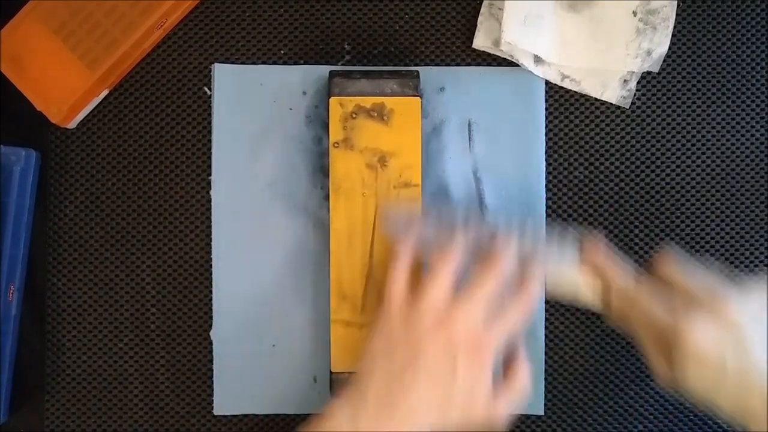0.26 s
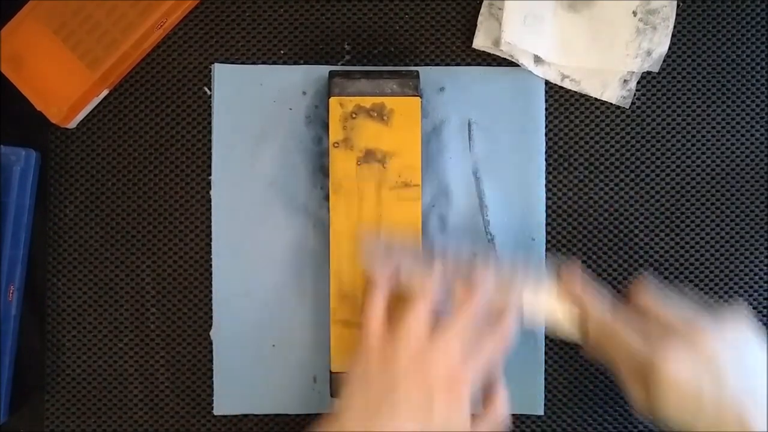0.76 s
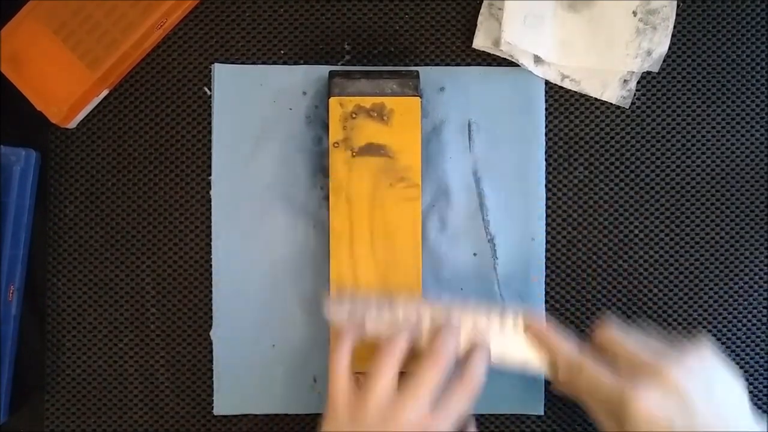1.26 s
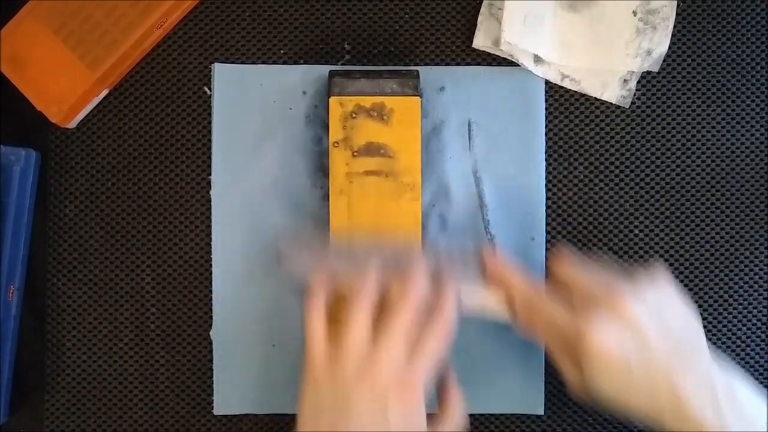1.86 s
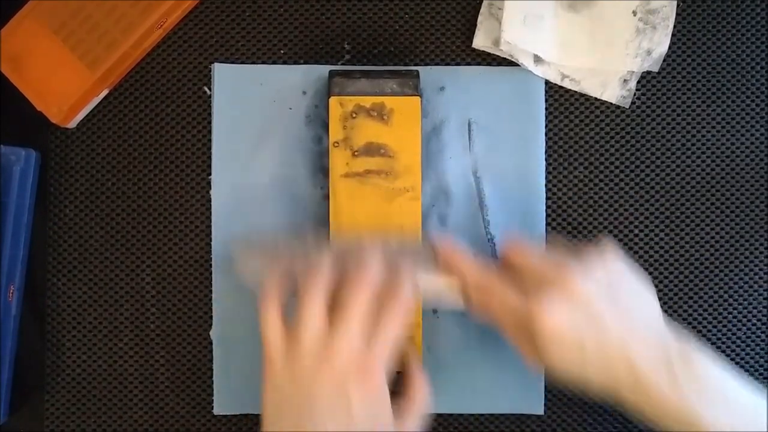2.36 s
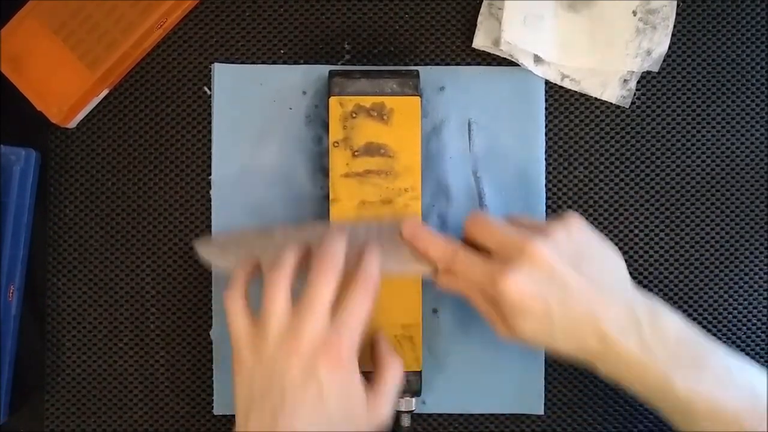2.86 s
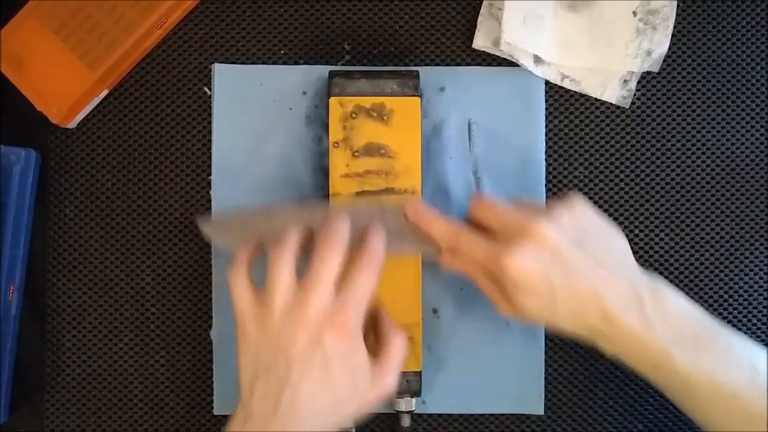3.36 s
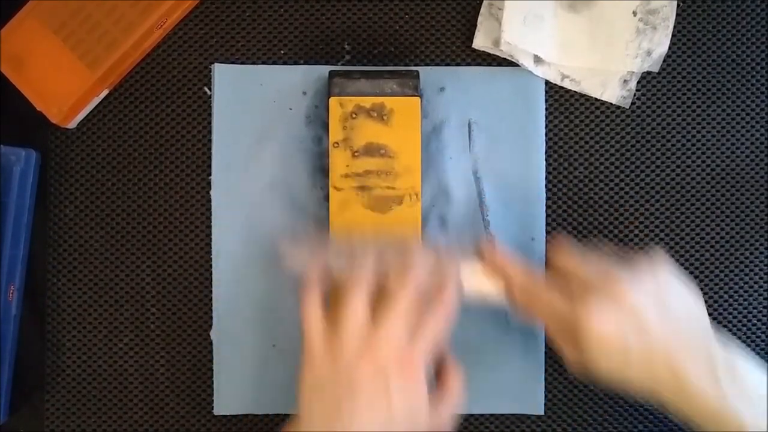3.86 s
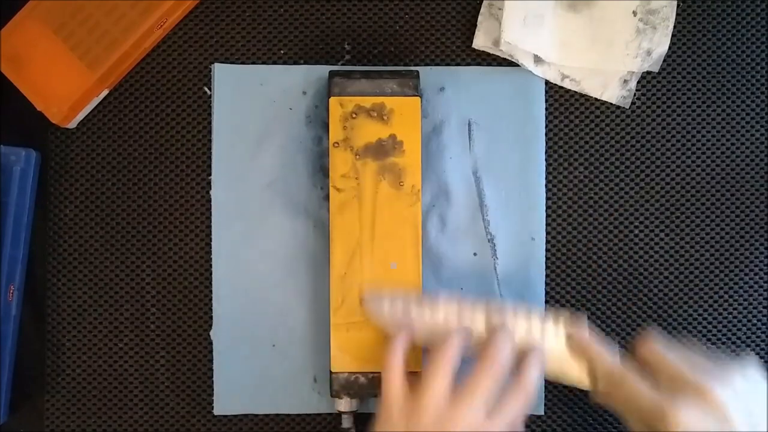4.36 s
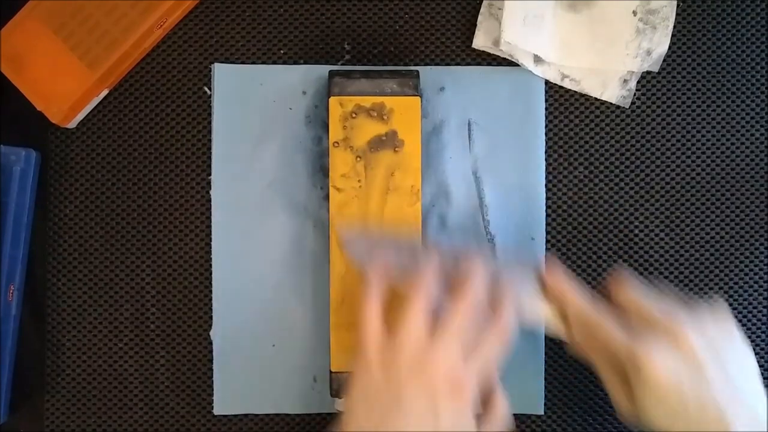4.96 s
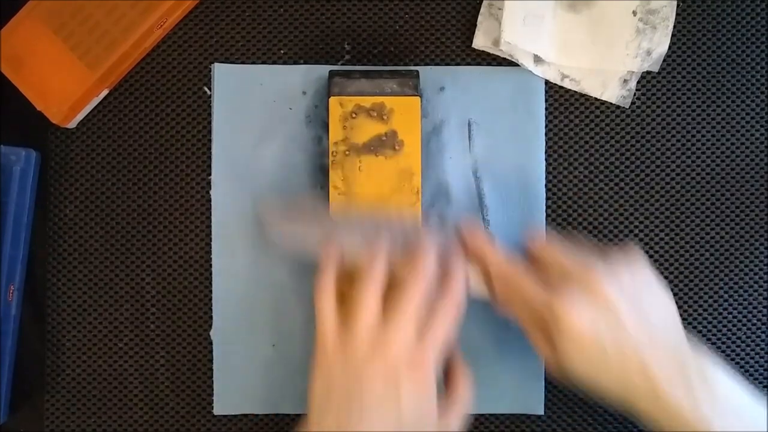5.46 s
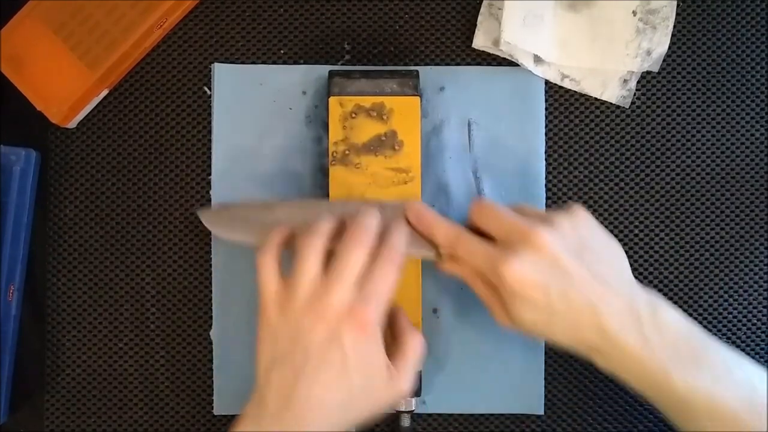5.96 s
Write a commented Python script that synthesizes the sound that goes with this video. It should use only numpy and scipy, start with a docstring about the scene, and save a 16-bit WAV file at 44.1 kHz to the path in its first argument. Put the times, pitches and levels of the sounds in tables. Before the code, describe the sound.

A steel knife blade is stroked briskly back and forth on a wet whetstone, a bright gritty rasp with a thin metallic ring, growing louder.

```python
"""Blade on a wet whetstone

A steel blade is drawn back and forth over a wet whetstone on a table. Grit clicks, coloured by the steel,
make a rasp that sinks at each turn; a cluster of beating modes rings over it. The overhanging blade hums in
a bending mode whose pitch moves with the free length. The table rumbles over a quiet room tone.
All layers are shaped noise, spread over two sides."""
import sys
import numpy as np
from scipy import signal
from scipy.io import wavfile
from scipy.ndimage import uniform_filter1d

SR = 44100
rng = np.random.default_rng(int(sys.argv[2]) if len(sys.argv) > 2 else 0)


def unload_wav(signal):
    """Save mono or channel-first audio to the path in sys.argv[1] as 16-bit WAV at rate SR, clipped to [-1, 1]."""
    wavfile.write(
        sys.argv[1],
        SR,
        np.round(np.clip(np.atleast_2d(signal).T, -1, 1) * 32767).astype(np.int16),
    )


N = 274302
T = np.arange(N) / SR  # seconds
SIZE = 2048  # samples in a spectral frame
HZ = np.fft.rfftfreq(SIZE, 1 / SR)[:, None]

# The back and forth of the blade; rasp and ring levels stand before the layers' own trims and the bite.
# Each row: turn in seconds, rasp at the turn in dB, rasp once moving in dB, place of the fastest moment
# between moving and braking (0-1), rasp then in dB, rasp before braking in dB, ring over the rasp early in dB,
# the same late in dB, centre of the excited ring modes early in Hz, the same late in Hz, contact in dB.
STROKES = [(-0.142, -56.4, -43.4, 0.45, -40.5, -47, -7.5, -3.5, 3550.0, 3750, 12),
           (0.06, -54.5, -45, 0.6, -38.5, -44.5, -13, -26, 3900, 3720.0, 4),
           (0.282, -57, -41, 0.81, -39, -45.5, -45, 3, 3700, 3900, 2.5),
           (0.503, -55, -43.5, 0.7, -38, -41.5, -23, -19, 3900, 3770, 5),
           (0.729, -53, -41, 0.89, -36, -39, -24, -9, 3640, 3360, 2.5),
           (0.946, -50.5, -44, 0.68, -34, -36.5, -11.5, 1, 3760, 3300, 4),
           (1.182, -50.5, -40, 0.71, -34, -40, 3, -1, 3840, 3200, 7),
           (1.405, -52, -46.5, 0.8, -31, -34.5, -19, 0, 3740.0, 3430, 7.5),
           (1.647, -50, -39, 0.2, -33.5, -36, -9.5, 3.5, 3100, 3230, 7.5),
           (1.852, -51.5, -43, 0.59, -30.5, -36, -7, 1.5, 3480, 3450, 3.5),
           (2.086, -45.5, -33, 0.71, -34.5, -28.5, -5, 6.5, 3480, 2900, 5),
           (2.309, -43.5, -39, 0.6, -28.5, -31.5, -2.5, -0.5, 3340, 3070, 2.5),
           (2.536, -43, -33.5, 0.33, -28.5, -32.5, 0, 9.5, 3250, 3390, 1),
           (2.745, -45, -41.5, 0.72, -26.5, -36, 2, 13, 3270, 3420, -2),
           (2.975, -46.5, -36.5, 0.38, -28, -40, -4, 10, 2910, 3340, 0),
           (3.186, -49, -39, 0.67, -27.5, -35, 1, 9, 3180, 3420, 0),
           (3.414, -45.5, -34.5, 0.42, -36.5, -37.5, -9, -1, 3000, 3180, 4),
           (3.631, -44.5, -39.5, 0.84, -26, -32.5, -4, -3.5, 2920, 3730, 0),
           (3.837, -42, -41, 0.23, -37.5, -35, -14, -8.5, 2900, 3580, -4.5),
           (4.072, -38, -40.5, 0.79, -31, -39.5, -6.5, -5, 3520, 3680, 2.5),
           (4.302, -43.5, -42, 0.8, -37, -43.5, -19, -10, 3740, 3900, 3.5),
           (4.512, -54, -44.5, 0.69, -39, -33.5, -29, -25, 3800, 3600, 5.5),
           (4.729, -50.5, -41, 0.25, -39.5, -36, -22, -14, 3620, 3740, 3),
           (4.939, -52.5, -44, 0.98, -30, -37, -14, -6.5, 3570, 3500, 4.2),
           (5.203, -39.5, -37.5, 0.4, -38, -32.5, -10.5, 1.5, 2766, 3220, 8),
           (5.405, -43.5, -48, 0.67, -30, -32, -2, 0.5, 3390, 3300, 8),
           (5.64, -41.5, -43, 0.87, -31, -30, -11, 1, 3240, 3020, 4.5),
           (5.856, -45.5, -41, 0.63, -27, -35, -3.5, 10.5, 3240, 3440, -0.5)]
SPEED_UP_S, BRAKE_S = 0.021, 0.035  # from a turn to moving, and from braking to the next turn
STOP_S = 6.119  # the last stroke ends
FIRM_DB = -30  # rasp of a firm stroke


def gain_of(db):
    """Decibels to gain."""
    return 10 ** (np.asarray(db) / 20)


def evened(x):
    """Scales to rms 1."""
    return x / np.sqrt(np.mean(x ** 2) + 1e-20)


def read(points):
    """Reads a spectrum table on the frequency bins, along log frequency."""
    f, value = np.transpose(points)
    return np.interp(np.log(HZ + 1), np.log(f + 1), value)


def follow(rows, t):
    """The columns of a curve at times t."""
    s, *columns = np.transpose(rows)
    return [np.interp(t, s, c) for c in columns]


def mode(hz, width):
    """Power of a resonance with total energy 1; width is the full width 6 dB down, in Hz."""
    shape = 1 / (1 + (2 * (HZ - hz) / width) ** 2) ** 2
    return shape / shape.sum(0)


def patches(shape, bins, frames):
    """Random field over pitch and time, smoothed over so many bins and frames, rms 1."""
    over_pitch = uniform_filter1d(rng.standard_normal(shape), bins, axis=0)
    return evened(uniform_filter1d(over_pitch, frames, axis=1))


def scratches(per_s, spread_db):
    """Frame times and spectra of two unrelated, equally strong streams of clicks of uneven size."""
    size = gain_of(spread_db * np.minimum(rng.exponential(1, (2, N)), 5))
    struck = rng.random((2, N)) < per_s / SR
    clicks = size * rng.standard_normal((2, N)) * struck
    _, t, z = signal.stft(evened(clicks), SR, nperseg=SIZE, noverlap=3 * SIZE // 4)
    return t, z / np.sqrt(2)


def heard(z, power, wider_db=0, shift_db=4):
    """Colours the streams and mixes them to two sides, whose likeness keeps shifting over pitch and time."""
    # Part of the sound that differs between the sides, before widening and shifting.
    # Each row: frequency in Hz, level in dB.
    side_part = [(60, -8.5), (280, -9), (400, -4), (600, -5), (1050, -19), (1350, -20), (1800, -5),
                 (2020, -6), (2090, -32), (2330, -34), (2560, -25), (2750, -6), (3250, -10), (3420, -26),
                 (3600, -25), (3900, -5), (4330, -22), (4780, -22), (5150, -5), (5700, -11), (6300, -6),
                 (6800, -8), (7200, -7), (7700, -13), (12000, -14), (13600, -7), (14300, -11)]
    # A stereo widener turns one side over and holds it back.
    # Each row: frequency in Hz, lead of the left side in half turns.
    left_lead = [(20, 1), (380, 1.1), (950, 2), (1400, 2), (1960, 2.55), (2090, 3), (2520, 3), (3250, 4),
                 (3650, 4), (4300, 4.98), (4900, 5.02), (5550, 6), (5850, 6.1), (6400, 7), (6900, 7.1),
                 (7700, 8), (15000, 8)]
    # Balance between the sides. Each row: frequency in Hz, left minus right in dB.
    left_tilt = [(200, .9), (500, 0), (1450, 0), (1800, 2.1), (2050, 0), (2560, 0), (2800, -4.5), (3200, 0),
                 (3700, 0), (4000, 3), (4350, 0), (4750, 0), (5100, -3.5), (6000, 0), (7700, 1.2),
                 (9000, -1.2), (14000, -.4)]
    shifting = patches(z.shape[1:], 12, 8)
    apart = np.clip(gain_of(read(side_part) + wider_db + shift_db * shifting), 0, 1)
    common = np.sqrt(1 - apart ** 2) * z[0]
    turn = np.exp(.5j * np.pi * read(left_lead)) * gain_of(read(left_tilt) / 2)
    left = (common + apart * z[1]) * turn
    right = (common - apart * z[1]) / turn
    pair = np.array([left, right]) * np.sqrt(SIZE * power)
    return signal.istft(pair, SR, nperseg=SIZE, noverlap=3 * SIZE // 4)[1][:, :N]


def stroke_db(t):
    """Rasp level: loudness follows blade speed, which picks up after a turn, peaks and brakes into the next."""
    # The edge catches on the stone and the rasp jumps up or down.
    # Each row: start in seconds, jump in dB, dying time in seconds.
    catches = [(0.294, -5, 0.023), (0.746, 3.5, 0.013), (1.657, 2, 0.012), (2.098, -6.5, 0.02),
               (3.195, 3, 0.012), (3.804, 3.5, 0.0065), (3.912, 4.5, 0.028), (4.095, 4.5, 0.012),
               (4.198, 3.5, 0.031), (4.745, 2.5, 0.017)]
    catch_rise_s = 0.00076
    settle_s, rest_s = 0.0039, 0.0066  # the blade lies almost still this long before and after a turn
    stop_db, fade_db_per_s = -40.5, 299  # the last stroke dies away
    turn, turn_db, moving_db, place, fastest_db, braking_db = np.transpose(STROKES)[:6]
    moving = turn + SPEED_UP_S
    braking = np.append(turn[1:], STOP_S) - BRAKE_S
    fastest = moving + np.clip(place, .04, .96) * (braking - moving)
    s = np.column_stack([turn - settle_s, turn + rest_s, moving, fastest, braking])
    db = np.column_stack([turn_db, turn_db, moving_db, fastest_db, braking_db])
    speed_gain = np.interp(t, np.append(s, STOP_S), gain_of(np.append(db, stop_db)))
    jumps_db = 0
    for start, jump_db, dying_s in catches:
        rise = np.clip((t - start) / catch_rise_s, 0, 1)
        jumps_db = jumps_db + jump_db * rise * np.exp(-np.maximum(t - start, 0) / dying_s)
    return jumps_db + 20 * np.log10(speed_gain) - fade_db_per_s * np.maximum(t - STOP_S, 0)


def grip(t):
    """Ring over rasp in dB, ring centre in Hz and contact in dB, sliding through each stroke."""
    early, late = 0.32, 0.86  # shares of a stroke at which its early and late values hold
    rows = np.array(STROKES)
    length = np.diff(np.append(rows[:, 0], STOP_S))[:, None]
    s = rows[:, :1] + length * [early, late]
    over_db, centre_hz = rows[:, 6:8], rows[:, 8:10]
    contact_db = rows[:, 10].repeat(2)
    return follow(np.column_stack([s.ravel(), over_db.ravel(), centre_hz.ravel(), contact_db]), t)


def bite(t):
    """Gain as the edge bites: it jumps at each turn, holds until the blade is moving, then settles."""
    bite_db, bite_s = 8, 0.038  # jump and dying time
    moving = np.transpose(STROKES)[0] + SPEED_UP_S
    stroke = np.maximum(np.searchsorted(moving, t + SPEED_UP_S) - 1, 0)
    since = t - moving[stroke]
    return gain_of(bite_db * np.exp(-np.maximum(since, 0) / bite_s))


def room(room_db=-56.5, drift_db=2.2):
    """Low room tone: steady noise under a falling spectrum that drifts in lumps."""
    # Colour of the room tone, before it is scaled as a whole.
    # Each row: frequency in Hz, density in dB per Hz.
    tone = [(25, 2), (45, -6), (65, 3), (130, 7.5), (300, 3.5), (390, 3), (480, -2.5), (600, -5.5),
            (1000, -5), (3000, -9.5), (14000, -29)]
    _, z = scratches(per_s=SR, spread_db=0)
    power = gain_of(2 * read(tone))
    lumps = gain_of(2 * drift_db * patches(z.shape[1:], 3, 10))
    return gain_of(room_db) * heard(z, power / power.sum() * lumps, shift_db=2.0)


def rumble(rumble_db=-55.0, share=1.0):
    """Hard strokes shake the stone's holder and the table: a broad low resonance with a narrow one in it."""
    t, z = scratches(per_s=12000, spread_db=1.5)
    level_db = rumble_db + share * (stroke_db(t) - FIRM_DB)  # share: dB per dB of rasp
    body = mode(430, 660) + 0.1 * mode(402, 66)
    return heard(z, gain_of(2 * level_db) * body, shift_db=1.0)


def bend(bend_db=-7.0, share=0.093, wobble=0.024, broken_db=6):
    """The overhanging blade hums in its lowest bending mode, higher as less of it hangs free."""
    # Path of the hum, before the trim and the wobble.
    # Each row: time in seconds, level under a firm stroke in dB, pitch in Hz.
    hum_path = [(0, -75, 1320), (.13, -48, 1530), (.36, -65, 1190), (.84, -58.5, 1050), (.9, -42.5, 1110),
                (.96, -51, 940), (1.16, -53, 1240), (1.24, -45.5, 1040), (1.38, -60, 890),
                (1.58, -48, 1460), (1.86, -62, 1370), (1.9, -40.5, 1366), (2.22, -39.5, 1360),
                (2.31, -45, 1156), (2.65, -42.5, 980), (2.76, -61, 970), (3.1, -49, 920), (3.44, -56, 950),
                (3.52, -40.5, 1020), (3.68, -44.5, 1245), (3.78, -36, 1410), (3.9, -57, 1410),
                (3.96, -48, 960), (4.26, -55.5, 1160), (4.5, -65, 1010), (5.05, -44.5, 1100),
                (5.14, -62, 1240), (5.21, -41.5, 1400), (5.28, -51.5, 1396), (5.72, -34.5, 1307),
                (5.9, -47, 1040), (5.94, -39, 1050), (6.22, -76, 970)]
    t, z = scratches(per_s=20000, spread_db=1)
    level_db, hz = follow(hum_path, t)
    level_db = level_db + bend_db + share * (stroke_db(t) - FIRM_DB)
    level_db = level_db + broken_db * np.minimum(patches(z.shape[1:], 6, 2), .6)  # the hum breaks up
    hz = hz * (1 + wobble * patches((1, len(t)), 1, 3)[0])
    hum = 1.08 * mode(hz, 92) + 0.06 * mode(hz, 1000)
    return heard(z, gain_of(2 * level_db) * hum)


def ring(skirt_db=-4, waver_db=13.5, ring_db=-9.0, linger_s=0.0061, gather=0.56):
    """A cluster of close modes; those near the excited centre sing loudest and beat together."""
    # Modes of the ringing blade. Each row: frequency in Hz, width in Hz, level within the cluster in dB.
    ring_modes = [(2870, 55, 0), (3010, 50, -2), (3140, 70, 0), (3230, 40, -2), (3308, 35, 2),
                  (3393, 35, 3), (3470, 35, 0), (3538, 50, 0), (3650, 35, 1), (3760, 50, -2)]
    t, z = scratches(per_s=18000, spread_db=3.0)
    over_db, centre_hz, _ = grip(t)
    cluster = sum(gain_of(2 * db) * mode(hz, width) for hz, width, db in ring_modes)
    waver = gain_of(2 * waver_db * np.minimum(patches(z.shape[1:], 3, 5), 1))
    focus = gain_of(-gather * np.maximum(over_db, 0))  # a strong ring gathers on fewer modes
    power = cluster * waver * mode(centre_hz, 260 * focus)
    skirt = gain_of(2 * skirt_db) * focus ** 2 * mode(centre_hz, 900) * waver
    power = power / power.sum(0) + skirt
    push = (gain_of(stroke_db(T)) * bite(T)) ** 2
    keep = np.exp(-1 / (linger_s * SR))  # the steel rings on a little as the push falls
    drive = np.maximum(push, signal.lfilter([1 - keep], [1, -keep], push))
    wider_db = 20 * (abs(HZ - 2480) < 220)
    return np.sqrt(drive) * heard(z, power * gain_of(2 * (over_db + ring_db)), wider_db, 5.4)


def rasp(streak_db=8.0, patchy_db=3.0, rasp_db=0.42, sing_width=260, top_streaks=0.65, band_shift_db=7):
    """Grit scratches drive the steel; narrow modes come and go as the contact point slides."""
    # Colour of grit on steel, before scaling. Each row: frequency in Hz, density in dB per Hz.
    grit_colour = [(300, -76), (800, -20), (1600, -15.5), (2200, -15.5), (2500, -29.5), (2900, -8.5),
                   (3500, -12.5), (3950, 0), (5000, 2), (6500, 3.5), (8000, 4.5), (10500, 6.5),
                   (12000, 6.5), (13000, 3.5), (13600, -4.5), (14100, 5), (14500, -13.5)]
    # How far contact lifts each range. Each row: frequency in Hz, share of the contact dB (0-1).
    contact_lift = [(300, 1), (2000, 0.85), (3900, 0.88), (4600, 0.5), (5500, 0.46), (8000, 0.51),
                    (12000, 0.12), (14000, 0.45)]
    # How far speed brightens each range. Each row: frequency in Hz, dB per dB of rasp.
    speed_tilt = [(7000, 0), (10000, 0.29), (12000, 0.27), (13000, 0.13), (14300, .05)]
    # Modes of the steel that stay put. Each row: frequency in Hz, width in Hz, level over the rasp in dB.
    steel_modes = [(3913, 69, -17.5), (5107, 93, -16), (5263, 68, -19.5), (5757, 38, -19),
                   (7790, 110, -18.5), (8700, 69, -20), (9430, 62, -16), (10720, 76, -15),
                   (12050, 200, -14.5)]
    # A mode sings for a moment, sliding with the blade.
    # Each row: start in seconds, end in seconds, from Hz, to Hz, level over the rasp at its height in dB.
    singing = [(0.07, 0.27, 8760, 9040, -3.5), (0.643, 0.722, 5000, 4960, -3), (0.91, 0.99, 4430, 4650, 4),
               (0.956, 1.101, 10470, 11440, 0.5), (0.986, 1.1, 4250, 4330, 0),
               (1.007, 1.098, 6040, 6050, -1), (1.133, 1.234, 5400, 4870, 2.5),
               (1.365, 1.676, 6940, 9080, -1.5), (1.467, 1.755, 1890, 2070, -16.5),
               (1.52, 1.795, 5230, 5260, -2.5), (1.642, 1.77, 8500, 8900, 1.5),
               (1.65, 1.757, 4000, 3970, -4), (1.95, 2.174, 5640, 5600, -2.5),
               (2.19, 2.562, 7970, 7150, -7), (3.803, 3.913, 1750, 2130, -15),
               (4.142, 4.26, 9800, 9240, -2), (4.185, 4.326, 4130, 4770, 1.5),
               (4.5, 4.67, 8830, 9200, -2.5), (4.845, 5.085, 5200, 5400, -7),
               (4.942, 5.026, 6160, 6300, -3.5), (5.124, 5.312, 2020, 2000, -14.5),
               (5.125, 5.25, 5400, 4500, 0)]
    bite_share = 0.51  # of the bite's dB, heard in the rasp
    t, z = scratches(per_s=30000, spread_db=1.0)
    contact_db = grip(t)[2]
    grit = gain_of(2 * read(grit_colour))
    body = grit / grit[HZ > 7500].sum()  # the treble sets the level
    body = body * gain_of(2 * contact_db * read(contact_lift))
    body *= gain_of(2 * read(speed_tilt) * (stroke_db(t) - FIRM_DB))
    body += sum(gain_of(2 * db) * mode(hz, width) for hz, width, db in steel_modes)
    for start, end, from_hz, to_hz, db in singing:
        way = np.clip((t - start) / (end - start), 0, 1)
        swell = gain_of(2 * db) * np.sin(np.pi * way)
        body += swell * mode(from_hz + way * (to_hz - from_hz), sing_width)
    streaks = np.minimum(patches(z.shape[1:], 4, 3), .8)  # more gaps than peaks
    streaks = streaks * np.clip(1.6 - HZ / 9000, top_streaks, 1)  # shallower on top
    blots = patches(z.shape[1:], 20, 5)
    power = body * gain_of(2 * (streak_db * streaks + patchy_db * blots))
    wide_band = abs(HZ - 4550) < 350
    wider_db = (7.5 + 1.04 * contact_db) * wide_band  # the sides differ more here at a higher contact value
    level = gain_of(stroke_db(T) + rasp_db) * bite(T) ** bite_share
    return level * heard(z, power, wider_db, np.where(wide_band, band_shift_db, 4.0))


def scene():
    """All layers together, from the room to the rasp."""
    return room() + rumble() + bend() + ring() + rasp()


def record(dry):
    """The band limit: a steep low-pass that keeps its timing."""
    edge_hz = 14260
    low_pass = signal.firwin(1023, edge_hz, window=("kaiser", 10), fs=SR)
    return signal.oaconvolve(dry, low_pass[None], "same")


dry = scene()
out = record(dry)
unload_wav(out)
```